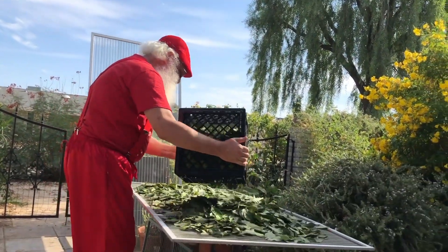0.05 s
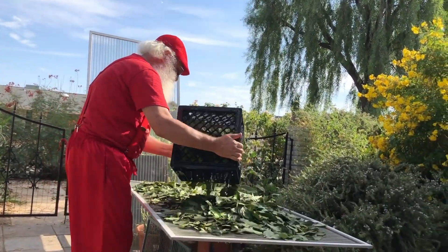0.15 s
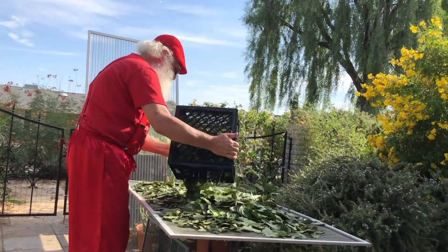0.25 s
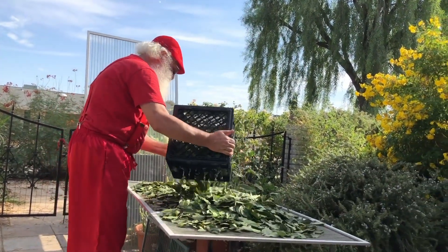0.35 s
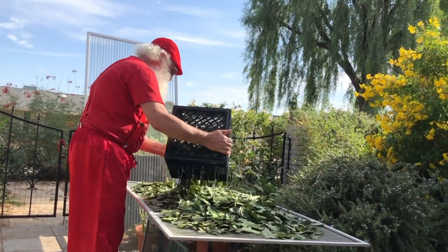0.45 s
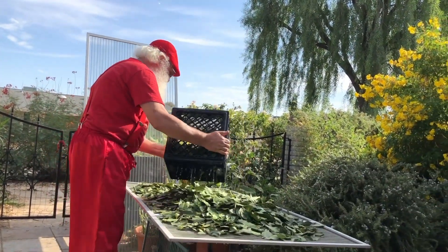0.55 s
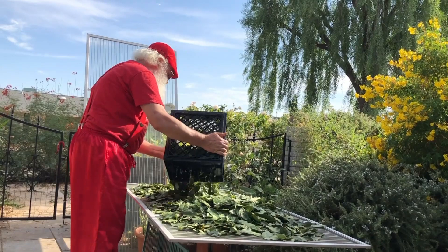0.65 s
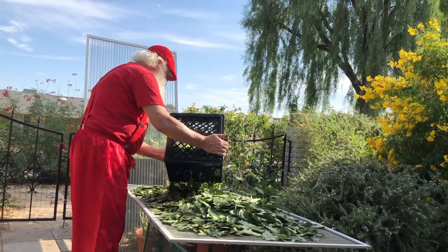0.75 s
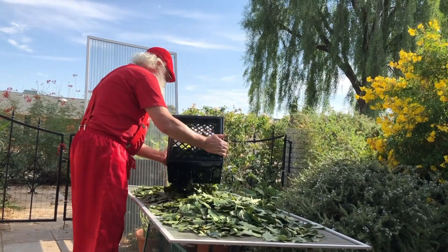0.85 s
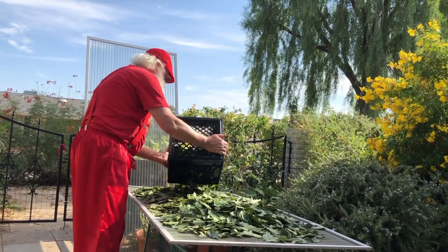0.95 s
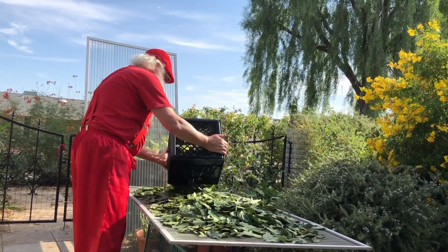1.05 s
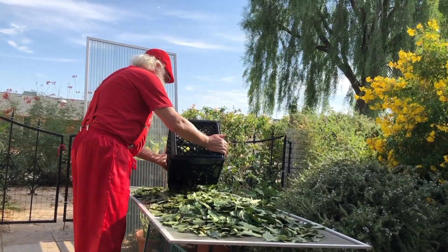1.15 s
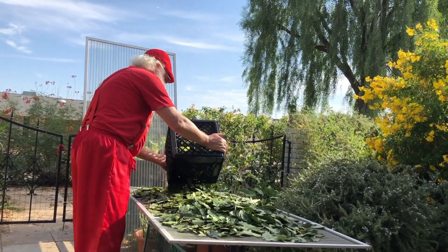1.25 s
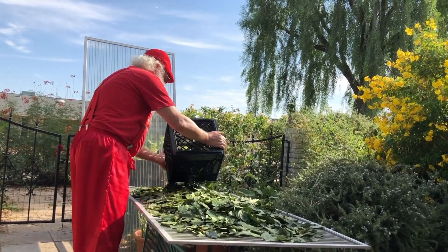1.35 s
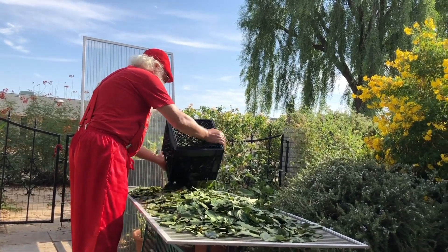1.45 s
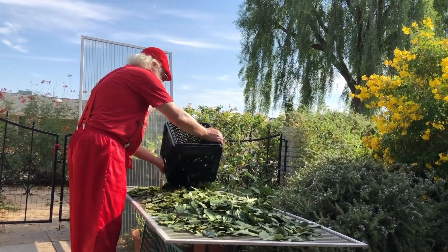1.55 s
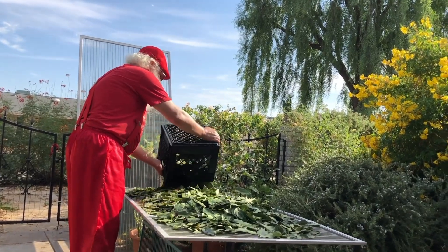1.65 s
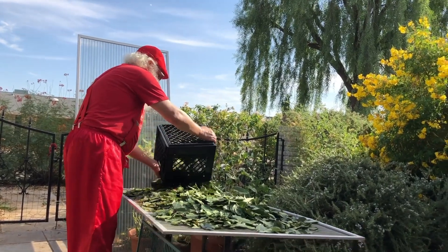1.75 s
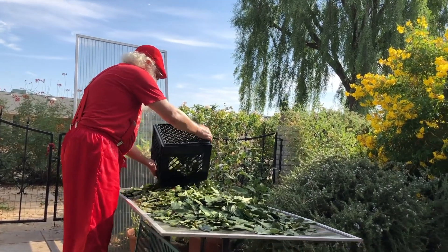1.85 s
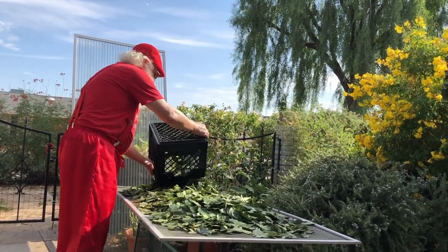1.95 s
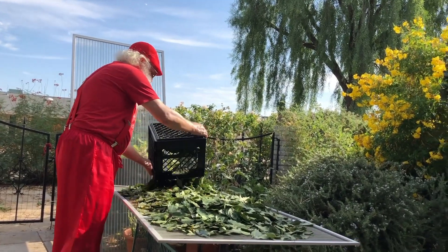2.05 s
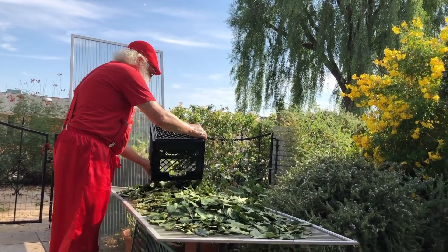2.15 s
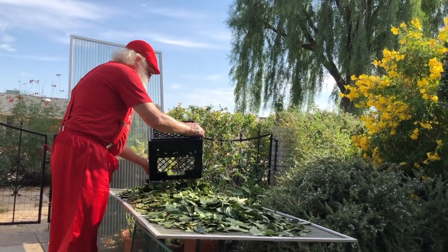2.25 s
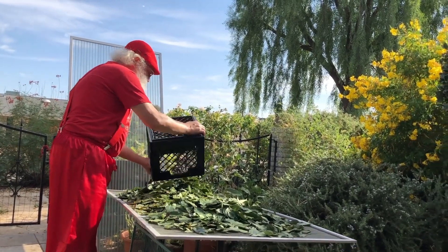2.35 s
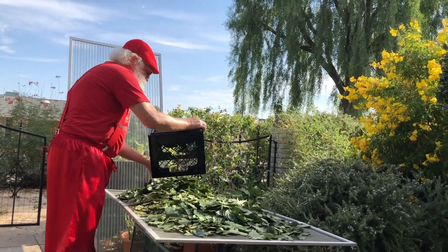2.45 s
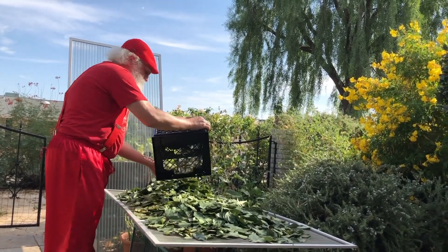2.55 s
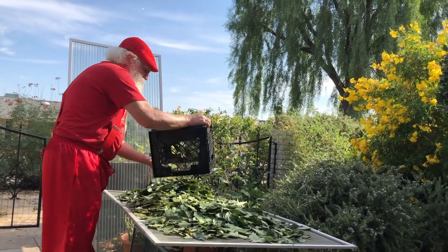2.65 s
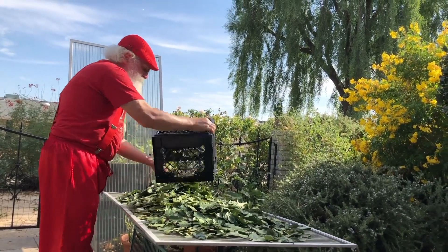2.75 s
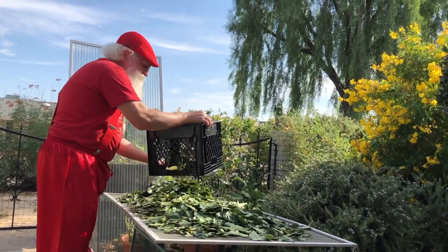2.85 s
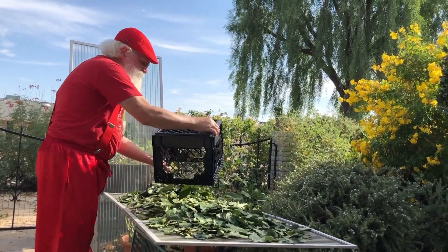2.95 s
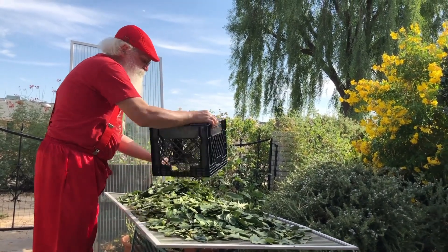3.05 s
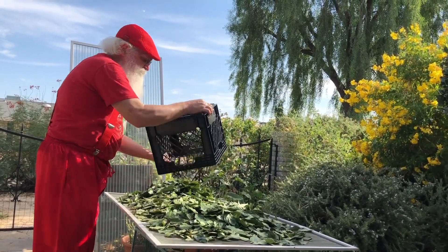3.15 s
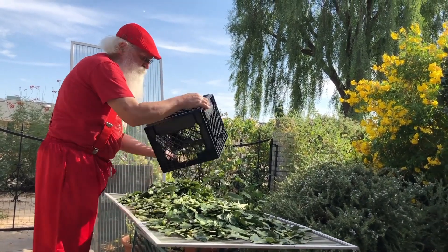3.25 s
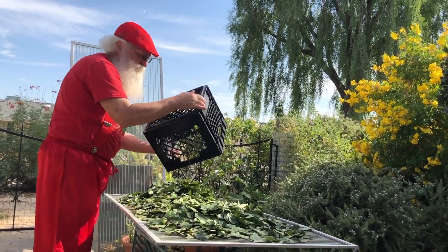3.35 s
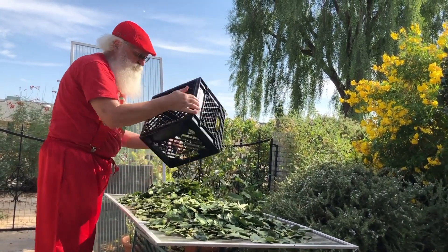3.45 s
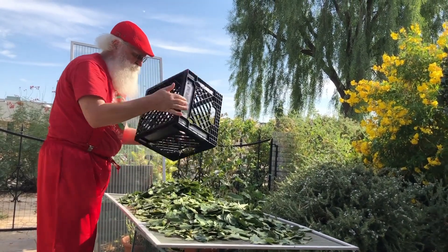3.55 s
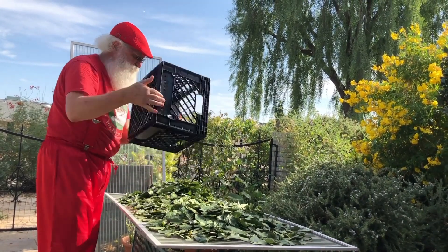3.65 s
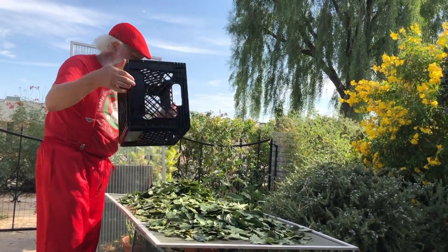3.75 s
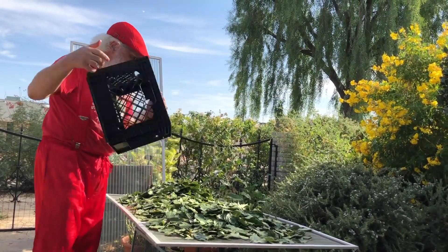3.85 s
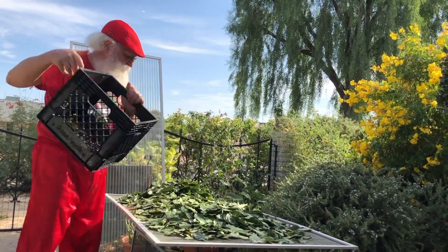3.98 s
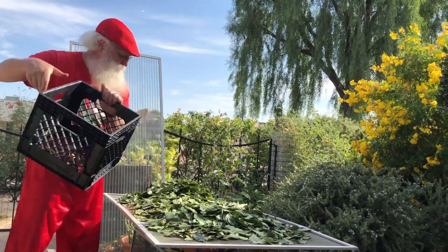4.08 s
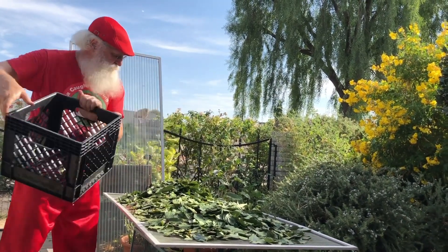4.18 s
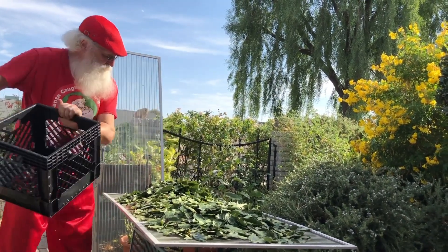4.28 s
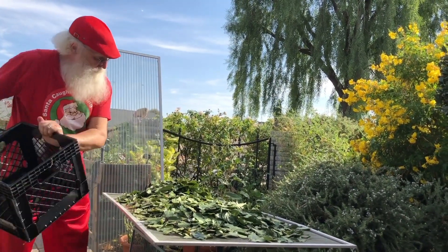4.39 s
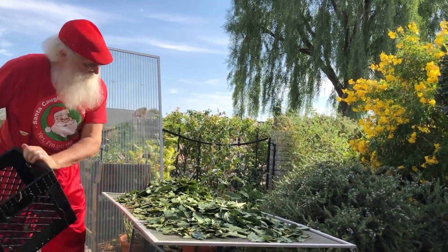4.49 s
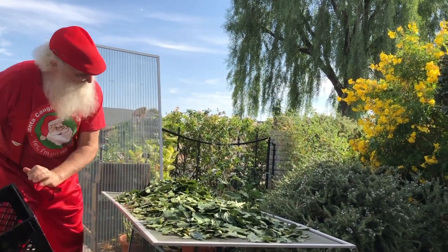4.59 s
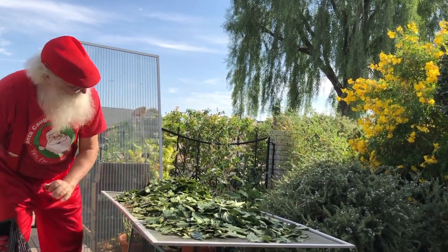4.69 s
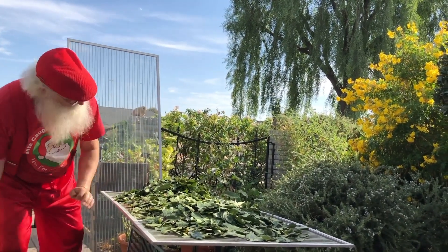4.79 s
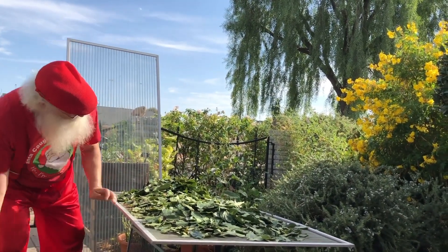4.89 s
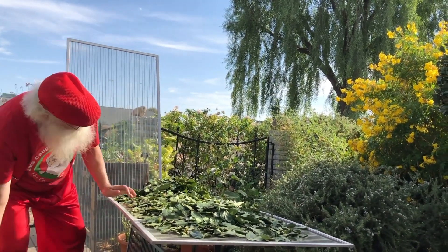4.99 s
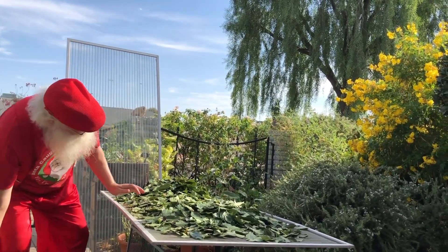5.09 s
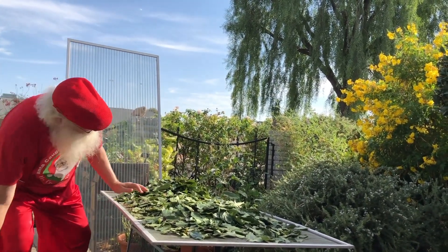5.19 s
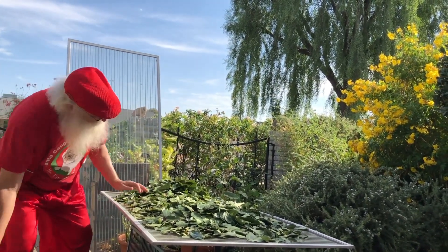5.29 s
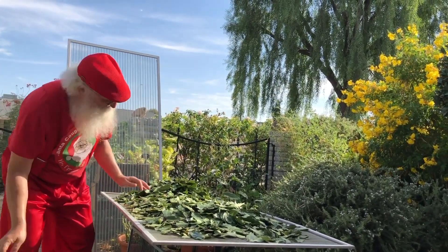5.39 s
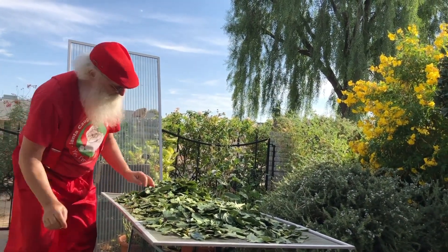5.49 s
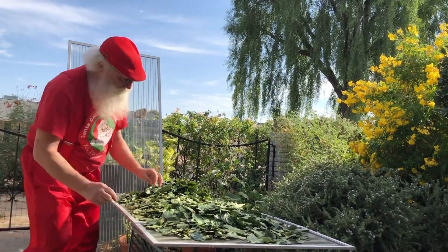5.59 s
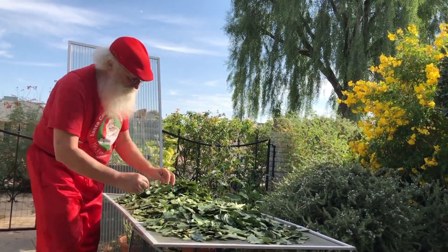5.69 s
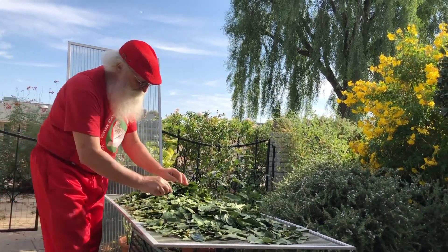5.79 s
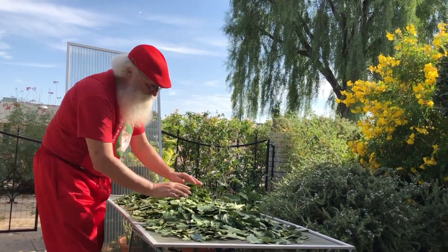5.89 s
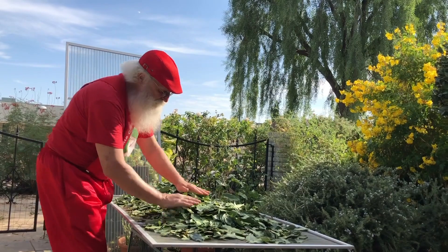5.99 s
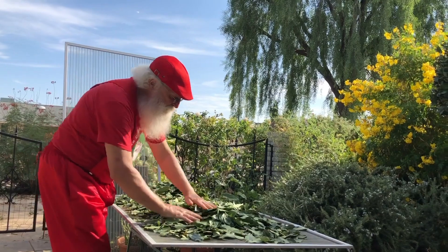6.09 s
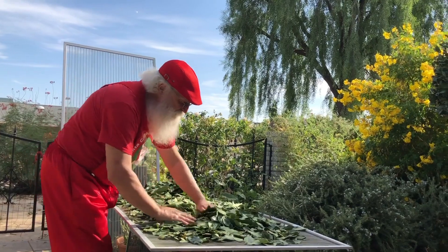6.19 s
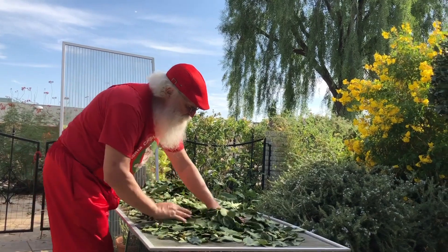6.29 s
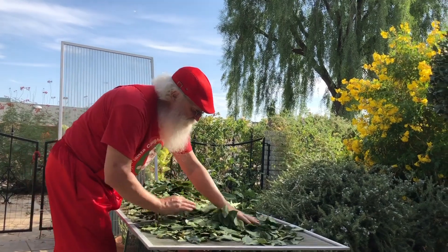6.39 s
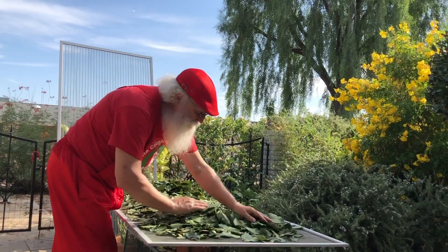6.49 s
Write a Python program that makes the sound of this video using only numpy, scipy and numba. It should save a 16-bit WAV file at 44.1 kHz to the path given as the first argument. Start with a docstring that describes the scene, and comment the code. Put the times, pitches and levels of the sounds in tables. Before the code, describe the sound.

Wet leaves rustle and slide out of a plastic crate, drops tick and plop, then the empty crate clatters on paving and hands spread the leaves.

```python
"""Close in a garden, over faint far traffic, a machine hum and hiss (filtered noise and a tone), wet leaves are
shaken from a plastic crate onto a mesh table: dense tiny rings, swelling as clumps slip and fall.
Drops and stalks tick as it drains (short rings with splashes); fat drops plop on rising notes.
The empty crate is dropped on paving, bounces and rattles to rest (decaying modes and noise bursts).
Hands then spread the leaves; one microphone feeds both channels."""
import sys
import numpy as np
from scipy import signal
from scipy.io import wavfile
from scipy.ndimage import uniform_filter1d
from numba import njit

SR = 44100
rng = np.random.default_rng(int(sys.argv[2]) if len(sys.argv) > 2 else 0)


def master(y):
    """Save y as 16-bit WAV."""
    cut = np.clip(np.atleast_2d(y).T, -1, 1)
    pcm = np.round(cut * 32767)  # scale
    wavfile.write(sys.argv[1], SR, pcm.astype(np.int16))


N = 287973


def undb(db):
    """Decibels to gain."""
    return 10 ** (np.asarray(db) / 20)


def level(x, db):
    """Scale to an rms level."""
    return x * undb(db) / np.sqrt(np.mean(x ** 2))


def band(x, hz, width):
    """Two-pole band-pass, gain 1 at the centre."""
    return signal.lfilter(*signal.iirpeak(min(hz, .45 * SR), hz / width, fs=SR), x)


def steep(x, hz, width):
    """The band-pass twice, each pass of the given width."""
    return band(band(x, hz, width), hz, width)


def walk(rate):
    """Random levels held 1 / rate s and slewed twice; spread near 1."""
    hold = int(SR / rate)
    steps = np.repeat(rng.standard_normal(N // hold + 1), hold)
    return 1.044 * uniform_filter1d(uniform_filter1d(steps, hold), hold)[:N]


def decay(t, t60):
    """Exponential fall of 60 dB in t60 seconds."""
    return np.exp(-np.log(1000) * t / t60)


def burst(t60, size=4096):
    """A noise burst that dies away."""
    return rng.standard_normal(size) * decay(np.arange(size) / SR, t60)


def add(out, s, x):
    """Mix x in at time s."""
    i = int(s * SR)
    out[i:i + len(x)] += x[:N - i]


@njit
def rings(n, start, step, cycles, size, glide):
    """Damped oscillations: step in radians a sample, down 50 dB after about twice the cycles, pitch gliding."""
    out = np.zeros(n)
    for k in range(len(start)):
        length = int(4 * np.pi * cycles[k] / step[k]) + 2
        advance = np.exp(1j * step[k] - 5.8 / length)  # one sample of turning and damping
        bend = np.exp(1j * step[k] * glide[k] / length)
        z = size[k] + 0j
        for i in range(start[k], min(n, start[k] + length)):
            swell_in = min(1., (i - start[k] + 1) * 16. / length)
            out[i] += z.imag * swell_in
            z, advance = z * advance, advance * bend
    return out


def timed_rings(s, db, hz, cycles, glide):
    """Rings at listed times; glide is the share by which each pitch rises over its ring."""
    start = (s * SR).astype(np.int64)
    return rings(N, start, 2 * np.pi * hz / SR, cycles + 0 * s, undb(db), glide + 0 * s)


def grains(centre_hz, spread_octaves, cycles, per_s, scatter_db):
    """A steady patter of tiny random rings, rms 1; a few are much louder than the rest."""
    when, pitch, size = rng.random((int(per_s * N / SR), 3)).T
    octaves = spread_octaves * np.log(pitch / (1 - pitch)) / 1.8  # a bell-shaped spread
    hz = np.minimum(centre_hz * 2 ** octaves, .36 * SR)
    size = undb(-scatter_db * np.log(size))
    start = (when * N).astype(np.int64)
    patter = rings(N, start, 2 * np.pi * hz / SR, np.full(len(hz), 1. * cycles), size, 0 * size)
    return level(patter, 0)


def air():
    """Far traffic and microphone hiss: third-octave noise bands that drift a little, together and apart."""
    # Background spectrum: (frequency [Hz], relative density [dB per Hz])
    spectrum = [(18, -36), (30, -14), (64, 8.5), (245, 1), (526, -7), (962, -7.5), (2120, -19),
                (3140, -19.5), (3670, -29), (5170, -20), (6900, -24.5), (14400, -22), (16000, -19.5)]
    hz, db = np.transpose(spectrum)
    swell = walk(0.98)
    mix = 0
    for f in 40 * 2 ** np.arange(0, 8.8, 1 / 3):
        band_db = np.interp(np.log(f), np.log(hz), db) + swell + walk(15)
        mix = mix + undb(band_db) * steep(rng.standard_normal(N), f, f / 3)
    return level(mix, -52)


def far_machine():
    """A machine far off: narrow noise bands waver as a hum beside a steadier tone."""
    # Hum bands: (centre [Hz], width of each filter pass [Hz], level [dB])
    hum_bands = [(55.5, 12, -65.5), (76.4, 4.1, -80), (117.8, 7, -60), (173.5, 8.4, -59.5)]
    hum = sum(level(steep(rng.standard_normal(N), hz, width), db) for hz, width, db in hum_bands)
    tone_hz = 240 + 1.483 * walk(3)
    tone = undb(2.0 * walk(6)) * np.sin(2 * np.pi * np.cumsum(tone_hz) / SR)
    return hum + level(tone, -59.5)


def yard(x):
    """Walls and paving return a short, dull scatter."""
    scatter = band(burst(0.35, size=16384), 1000, 11200)
    tail = np.concatenate([np.zeros(300), scatter])  # the first return lags by 300 samples
    tail = tail / np.sqrt(np.sum(tail ** 2))
    return x + undb(-10.5) * signal.fftconvolve(x, tail)[:N]


def plops():
    """Each fat drop traps an air pocket whose note rises; a slosh follows."""
    # Fat drops: (time [s], note level [dB], starting pitch [Hz], slosh above the note [dB])
    fat_drops = [(2.088, -43, 736, -1), (2.497, -40, 1410, -7), (2.576, -39, 980, 6.5),
                 (2.589, -40, 1370, -3), (2.695, -39, 1430, -2.5), (3.088, -37.5, 888, -18),
                 (3.237, -41.5, 1030, -3), (3.823, -44.5, 725, -6), (3.851, -48, 900, 13.5),
                 (4.078, -42.5, 734, 8), (4.686, -40, 1440, -8), (4.741, -46, 1050, -6),
                 (4.819, -37.5, 2000, 2.5), (4.867, -38, 947, 2), (5.011, -41, 1790, -4),
                 (5.914, -39, 920, -6), (5.929, -37.5, 904, -4)]
    s, db, hz, _ = np.transpose(fat_drops)
    out = timed_rings(s, db, hz, cycles=14, glide=0.085)
    for s, db, hz, slosh_db in fat_drops:
        add(out, s, undb(db + slosh_db) * steep(burst(0.19, size=8192), hz, .6 * hz))
    return out


def drops(splash_s=0.027, lowest_splash_hz=4900, hiss_s=0.096, hiss_db=-5):
    """Each fine drop rings briefly, splashes and leaves a hiss near its pitch, over a scattered patter."""
    # Fine drops that tick on leaves: (time [s], ring level [dB], pitch [Hz], splash above the ring [dB])
    fine_drops = [(0.247, -29, 4600, -12), (0.2932, -29, 6300, -6), (0.325, -24, 6460, -13),
                  (0.338, -26, 6300, -10), (0.5857, -33, 2230, -7), (0.7744, -31, 4670, -1),
                  (1.6943, -21, 4170, -14), (1.724, -34, 3160, -16), (1.9906, -36, 2840, -8),
                  (2.1435, -34, 6500, -13), (2.326, -31.5, 5560, -8), (2.365, -31, 4470, -10),
                  (2.5376, -43, 7630, -10), (2.62, -34, 6200, -2), (2.6828, -37, 5500, -8),
                  (2.7771, -32.5, 5030, -11), (2.85, -43.5, 3570, 8.5), (2.946, -39, 5930, -1),
                  (3.0775, -41, 4770, 3), (3.1464, -36, 5370, -13), (3.1968, -27.5, 5120, -9),
                  (3.3003, -33.5, 3160, -9), (3.3579, -32, 5100, -9), (3.4002, -41, 5310, -8),
                  (3.4311, -42, 3570, -8), (3.457, -36, 3080, -14), (3.59, -42, 2600, -4),
                  (3.632, -37.5, 6100, -15), (3.6606, -46, 2570, -12), (3.704, -32.5, 7300, -2.5),
                  (3.7194, -43, 2750, -8), (3.8533, -41.5, 2950, -0.5), (3.9732, -44, 5370, 3),
                  (4.004, -44, 5740, 1), (4.0368, -38.5, 3790, -6), (4.058, -32.5, 5270, -7),
                  (4.109, -32, 8350, -11), (4.172, -41, 4100, -10), (4.2267, -35, 5200, -4),
                  (4.261, -41.5, 5280, 4), (4.3894, -43, 4720, 0), (4.446, -39, 5750, -5),
                  (4.489, -34.5, 2390, -10), (4.715, -33, 3020, -5), (4.77, -36, 2980, -3.5),
                  (4.798, -37, 2390, -16), (4.8218, -37, 1950, -9), (4.828, -35.5, 2420, -17),
                  (4.8494, -43, 5550, -10), (4.9047, -41, 5500, -7), (5.217, -39, 2240, -4),
                  (5.2407, -33, 2860, -6), (5.2624, -33, 4640, -2), (5.834, -33.5, 5670, -15),
                  (6.0306, -35, 4750, -13), (6.13, -38, 4100, -2)]
    s, db, hz, _ = np.transpose(fine_drops)
    out = timed_rings(s, db, hz, cycles=10.5, glide=0)
    for s, db, hz, splash_db in fine_drops:
        splash_hz = max(hz, lowest_splash_hz)
        add(out, s, undb(db + splash_db) * steep(burst(splash_s), splash_hz, splash_hz))
        add(out, s, undb(db + hiss_db) * steep(burst(hiss_s, size=8192), hz, 0.19 * hz))
    patter = grains(centre_hz=4760, spread_octaves=0.645, cycles=6.5, per_s=130, scatter_db=2.15)
    return out + level(patter, -67)


def leaves(flutter_db=1.46, patch_db=0.68):
    """Three grain sizes follow hands and clumps; all flutter together, and each in patches of its own."""
    # Leaves shaken out, then spread: (time [s], slap of whole leaves [dB],
    # crackle of edges above slap [dB], spray above slap [dB])
    handling = [(0.0, -52.5, 2, -1), (0.14, -55, 4, -8), (0.28, -51.5, 4.5, -4), (0.36, -49.5, 4, -1.5),
                (0.9, -52.5, 5, -1), (1.2, -56.5, 5, -4), (1.44, -54, 2.5, -7), (1.56, -52, 1.5, -5),
                (1.714, -43, 2, -8), (1.87, -53, 1.5, -5.5), (2.1, -52, 1.5, 0), (2.17, -63, 7.5, -3),
                (2.3, -61, -1, -8), (2.6, -67.5, 3, -3), (3.3, -66, 6, 1), (3.6, -68, -9, -1),
                (4.6, -62.5, -2.5, -5), (5.0, -69, -6, 0), (5.8, -75.5, 8, 8), (6.05, -61.5, 5, -3),
                (6.33, -51, 8.5, 2), (6.53, -55.5, 10, 4.5)]
    # Clumps that slip and fall: (time [s], rise [s], fade [s], slap [dB],
    # crackle above slap [dB], spray above slap [dB])
    clumps = [(0.292, .003, 0.072, -57.5, 3, 16.5), (0.57, 0.033, 0.037, -59, 12, 11),
              (0.74, .03, 0.052, -53.5, 8, 7.5), (0.9, 0.03, 0.074, -50, 2.5, -4),
              (1.05, 0.015, 0.069, -53, 5, -8), (2.02, 0.047, 0.049, -58, 4, 9),
              (2.38, 0.019, 0.023, -66, 8, 9), (2.67, 0.016, 0.044, -50, -1.5, -14),
              (2.85, 0.012, .08, -54.5, 2.5, -9), (2.945, 0.011, 0.1, -55.5, 0, -7),
              (3.06, 0.025, 0.1, -53, -0.5, -10), (3.2, 0.011, 0.072, -61, 6.5, -7),
              (3.25, 0.013, 0.037, -53.5, 4, -4), (3.38, 0.018, 0.034, -57.5, 5, -3),
              (3.7, .004, .05, -70, 9, 10), (3.82, 0.025, 0.072, -65, -21, -18),
              (4.06, 0.011, 0.052, -49.5, -9, -18), (4.11, 0.013, 0.04, -57.5, 7, -2),
              (4.38, 0.024, .06, -57.5, -5, -14), (4.48, 0.016, 0.053, -60, -16, -17),
              (4.67, 0.018, 0.066, -54.5, -3, -18), (4.85, 0.027, 0.044, -58, -15, -20),
              (5.906, 0.025, 0.044, -58.5, 9.5, 4), (5.96, 0.018, 0.02, -52, -11, -12)]
    t = np.arange(N) / SR
    s, slap_db, crackle_db, spray_db = np.transpose(handling)
    columns = (column[:, None] for column in np.transpose(clumps))
    start, rise, fade, clump_slap_db, clump_crackle_db, clump_spray_db = columns
    attack = np.clip((t - start) / rise, 0, 1)
    swell = attack * np.exp(-(np.maximum(t - start - rise, 0) / fade) ** 2)

    def layer(hand_db, clump_db, patter):
        """Hand and clump powers add to drive one grain size."""
        hand_power = undb(np.interp(t, s, hand_db)) ** 2
        clump_power = np.sum((swell * undb(clump_db)) ** 2, axis=0)
        return np.sqrt(hand_power + clump_power) * undb(patch_db * walk(18)) * patter

    slap = grains(centre_hz=1517, spread_octaves=0.44, cycles=2.88, per_s=2500, scatter_db=1.5)
    crackle = grains(centre_hz=5100, spread_octaves=0.3, cycles=2.16, per_s=5500, scatter_db=1.7)
    spray = grains(centre_hz=10700, spread_octaves=0.37, cycles=2.8, per_s=9700, scatter_db=1.7)
    mix = layer(slap_db, clump_slap_db, slap)
    mix = mix + layer(slap_db + crackle_db, clump_slap_db + clump_crackle_db, crackle)
    mix = mix + layer(slap_db + spray_db, clump_slap_db + clump_spray_db, spray)
    return mix * undb(flutter_db * walk(30))


def crate(detune=0.0072, rough=0.56, rough_hz=35, swell_s=0.0039):
    """Each blow rings the frame; modes waver as it rocks on the stone, the edge cracks and the ribs rattle."""
    # Blows on the paving: (time [s], crack [dB], treble snap [dB], boom [dB],
    # share of the modes' ring time [ratio], brightness of the ring [dB per octave])
    blows = [(5.0694, -14, -35, -4, 0.55, 0), (5.1262, -40, -46, -26.5, 0.46, 3),
             (5.3168, -12, -33, -8.5, 0.79, 0.4), (5.352, -17.5, -27, -7.5, 0.69, -2),
             (5.374, -29, -41, -16, 0.82, -2), (5.4048, -29, -43, -17.5, 0.7, -1.2),
             (5.4549, -29, -30.5, -22, 0.57, -1), (5.482, -31, -50, -12.5, 0.6, -1),
             (5.4891, -33, -31, -17, 0.67, 1.5), (5.5103, -25.5, -46, -13.5, 0.69, 1),
             (5.5477, -33, -36, -27, .97, -9), (5.58, -43, -40, -28.5, 0.78, -5.5),
             (5.6393, -45, -45, -36, 0.71, -10)]
    # Crate modes: (frequency [Hz], relative level [dB], t60 before each blow's share [s])
    modes = [(114, -37, 0.14), (151, -24, 0.25), (238.6, -23.5, 0.48), (276.3, -19, 0.22), (310, -20, 0.21),
             (370.5, -17.5, 0.51), (410, -14.5, 0.19), (435, -26, 0.26), (479, -11.5, 0.18),
             (517.4, -6.5, 0.18), (541.5, -10.5, 0.24), (623, -22, 0.23), (691, -19, 0.17),
             (763, -17.5, 0.22), (852, -20.5, 0.21), (998, -19.5, 0.14), (1091, -19, 0.14),
             (1231, -21, 0.14), (1318, -19, 0.13), (1410, -14.5, 0.079), (1610, -16.5, 0.055),
             (1774, -16.5, 0.048), (1903, -24, 0.087), (2065, -20, 0.044), (2340, -27, 0.066),
             (2710, -37, 0.049), (2960, -27, 0.032)]
    out, t = np.zeros(N), np.arange(SR // 2) / SR
    hz, db, t60 = (column[:, None] for column in np.transpose(modes))
    sign = (-1.) ** np.arange(len(modes))[:, None]  # neighbouring modes swing against each other
    for s, crack_db, snap_db, boom_db, share, bright_db in blows:
        # every blow lands elsewhere
        place, shift, pace, phase = rng.standard_normal((len(modes), 4)).T[..., None]
        rock_hz = rough_hz * (1 + 0.266 * pace)
        rock = rough * np.sqrt(hz / 530) * np.sin(2 * np.pi * rock_hz * t + 3 * phase)
        mode_db = db + 1.5 * place + bright_db * np.log2(hz / 530)
        gain = sign * undb(mode_db) * np.exp(rock) * decay(t, t60 * share)
        wave = np.sin(2 * np.pi * hz * t * (1 + detune * shift) + rock)
        body = np.sum(gain * wave, axis=0)
        add(out, s, undb(boom_db) * body * (1 - np.exp(-t / swell_s)))

        crack = steep(burst(0.015), 2760, 5400)
        snap = steep(burst(0.038), 10000, 15000)  # the hard rim snaps on the stone
        rattle = steep(burst(0.13, size=8192), 1070, 1800)
        thud = steep(burst(0.22, size=8192), 330, 420)  # the panels thud without a pitch
        clack = steep(burst(0.043), 2360, 1200)  # dense short rib modes
        add(out, s, undb(crack_db) * crack)
        add(out, s, undb(snap_db) * snap)
        add(out, s, undb(boom_db - 11.5) * rattle)
        add(out, s, undb(boom_db - 8) * thud)
        add(out, s, undb(crack_db + 1.5) * clack)
    too_small_for_bass = signal.butter(2, 90, "high", fs=SR, output="sos")
    return signal.sosfilt(too_small_for_bass, out)


def scene():
    """All sources on one microphone; drops, plops and crate also scatter off the yard."""
    background = air() + far_machine()
    echoing = yard(drops() + plops() + crate())
    return np.tile(echoing + leaves() + background, (2, 1))


def record(dry):
    """The microphone loses the deep bass and the recorder cuts the top."""
    thin = signal.sosfilt(signal.butter(3, 45, "high", fs=SR, output="sos"), dry)
    top_cut = signal.ellip(10, .2, 70, 15900, fs=SR, output="sos")
    return signal.sosfilt(top_cut, thin)


dry = scene()
out = record(dry)
master(out)
```